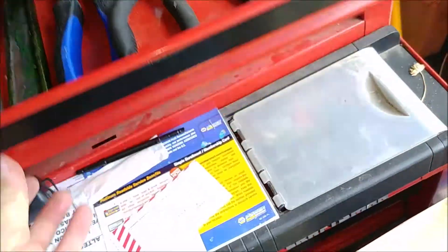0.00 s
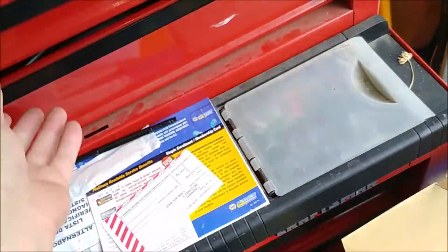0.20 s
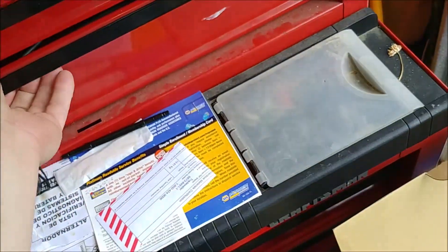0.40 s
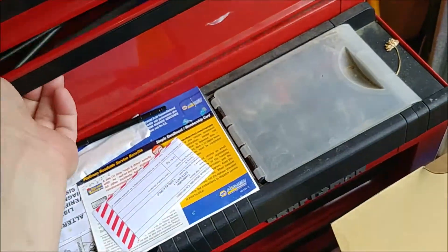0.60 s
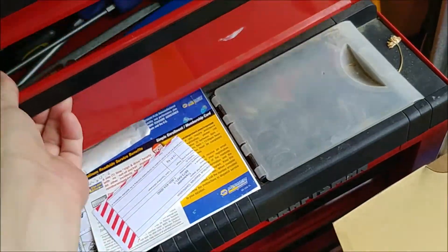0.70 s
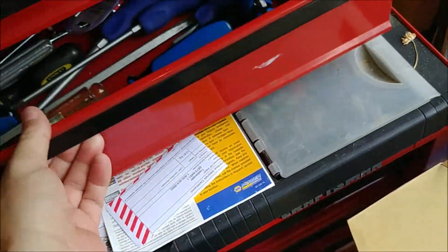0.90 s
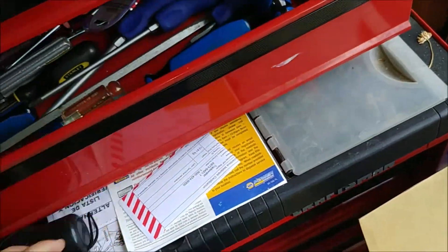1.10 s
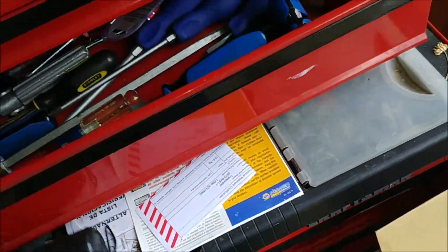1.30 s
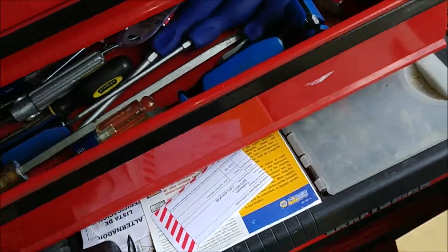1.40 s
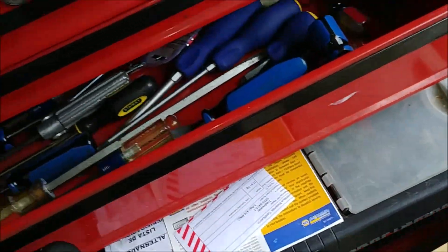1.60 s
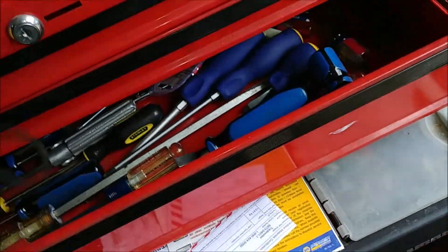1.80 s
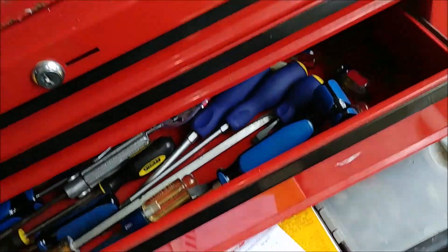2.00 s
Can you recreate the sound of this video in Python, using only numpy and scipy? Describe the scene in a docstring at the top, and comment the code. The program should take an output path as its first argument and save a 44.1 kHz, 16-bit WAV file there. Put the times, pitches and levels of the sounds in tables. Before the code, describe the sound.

A steel tool chest drawer rattles along its runners and slams shut at about 0.3 seconds, the cabinet booming briefly and loose tools jingling. From 0.6 seconds another drawer scrapes open with clinks and faint squeaks, knocking against its stop at 1.1 seconds. A sharp metal clack follows at 1.5 seconds. A hand brushes softly, and everything is close, over a low garage hum.

```python
"""In a humming garage, a steel tool-chest drawer rattles along its runners and slams shut.
Each blow rings sheet steel, panels and runners; the slam booms through the cabinet.
The next drawer is pulled out and knocks against its stop, then metal clacks sharply once more.
Loose tools clink, the runners squeak faintly and a hand brushes softly, all close by."""
import sys
import numpy as np
from scipy import signal
from scipy.fft import rfft, irfft
from scipy.io import wavfile
from scipy.ndimage import uniform_filter1d

SR = 44100
rng = np.random.default_rng(int(sys.argv[2]) if len(sys.argv) > 2 else 0)


def dump(signal):
    """Clip the signal to [-1, 1] and save it as 16-bit WAV at the path in sys.argv[1]."""
    limited = np.clip(np.atleast_2d(signal).T, -1, 1)
    pcm = np.round(limited * 32767).astype(np.int16)
    wavfile.write(sys.argv[1], SR, pcm)


N = 92610
T = np.arange(N) / SR
FREQ_HZ = np.maximum(np.arange(N // 2 + 1) * SR / N, 1)
BAND_HZ = 31.25 * 2 ** np.arange(0, 9.1, .5)


def undb(db):
    """Decibels to gain."""
    return 10 ** (np.asarray(db) / 20)


def lookup(table, hz, column=1):
    """One column of a table, read along log frequency."""
    table = np.array(table, float)
    return np.interp(np.log(hz), np.log(table[:, 0]), table[:, column])


def fade(t, t60_s):
    """Exponential decay."""
    return np.exp(-np.log(1000) * t / np.maximum(t60_s, .005))


def wander(smooth_s):
    """Smooth random drift with a spread of 1."""
    drift = uniform_filter1d(rng.standard_normal(N), max(int(smooth_s * SR), 1))
    return drift / drift.std()


def bell(centre_s, width_s):
    """Gaussian swell and fade."""
    return np.exp(-.5 * ((T - centre_s) / width_s) ** 2)


def tint(bands, db):
    """Mix the bands at the given levels."""
    return np.tensordot(undb(db), bands, 1)


# Each row: frequency in Hz, likeness of left and right from 0 to 1.
STEREO_LIKENESS = [(130, .96), (400, .92), (700, .65), (1400, .12), (5000, .02)]


def noise_bands():
    """Half-octave stereo noise bands, unit power per octave, alike in the bass: bands x 2 x N."""
    alike = np.clip(lookup(STEREO_LIKENESS, FREQ_HZ), 0, 1)
    mid, side = rfft(rng.standard_normal((2, N)))
    pair = mid * np.sqrt(1 + alike) + np.array([[1], [-1]]) * side * np.sqrt(1 - alike)
    half_octaves = 2 * np.log2(FREQ_HZ / BAND_HZ[:, None])
    shapes = np.cos(np.pi / 2 * np.clip(half_octaves, -1, 1)) ** 2
    bands = irfft(pair * shapes[:, None], N)
    return bands / np.sqrt(2 * np.mean(bands ** 2, axis=(1, 2), keepdims=True))


def mode_ring(modes, t, t60_s, scatter=.004, half_t60_hz=8900):
    """Clear modes, detuned at each blow; high ones die first and differ more in phase left to right."""
    out = 0
    for hz, db in modes:
        phases = (1 - lookup(STEREO_LIKENESS, hz)) * rng.uniform(-np.pi, np.pi, (2, 1))
        pitch_hz = hz * (1 + scatter * rng.standard_normal())
        decay = fade(t, t60_s / (1 + hz / half_t60_hz))
        out = out + undb(db) * decay * np.sin(2 * np.pi * pitch_hz * t + phases)
    return out


# Each row: frequency in Hz, octave level in dB, base t60 in seconds.
SHEET_STEEL = [(40, -38.5, 0.32), (81, -13.5, 0.33), (171, -7, 0.42), (450.6, 1, 0.3), (800, -11.5, 0.32),
               (1120, -6, 0.3), (2245, -3, 0.22), (4270, -1, 0.18), (7750, -5.5, 0.2), (15000, -8.5, 0.16)]


def sheet_ring(bands, t, db, t60_factor):
    """Countless close modes of sheet steel, as decaying noise; the high ones die first."""
    decay = fade(t, t60_factor * lookup(SHEET_STEEL, BAND_HZ, column=2)[:, None])
    return np.einsum("bcn,bn->cn", bands, decay * undb(db)[:, None])


# Each row: frequency in Hz, octave level in dB.
GARAGE_SPECTRUM = [(30, -88.5), (60, -57.5), (100, -46.5), (200, -65), (700, -64.5), (1800, -74),
                   (6000, -71), (15000, -66)]


def garage():
    """Low steady hum and faint hiss of the room."""
    return tint(noise_bands(), lookup(GARAGE_SPECTRUM, BAND_HZ))


# Each row: frequency in Hz, octave level in dB.
RUB_SPECTRUM = [(300, -34), (1500, -14), (3500, 9.5), (5500, -4.5), (8000, 0), (15000, -5.5)]
# Each row: centre in seconds, level in dB, half width in seconds, tilt in dB per octave.
RUBS = [(0.726, -40, 0.015, 6), (0.764, -44.5, 0.037, 1), (1.294, -55, 0.015, 12), (1.39, -55, 0.028, 4),
        (1.476, -47.5, 0.011, 5.5), (1.775, -62, 0.052, 4.5), (2.091, -60.5, 0.02, 5)]


def brushing():
    """Hand and drawer rub in short, soft hisses."""
    bands, octaves = noise_bands(), np.log2(BAND_HZ / 4500)
    return sum(tint(bands, db + lookup(RUB_SPECTRUM, BAND_HZ) + tilt * octaves) * bell(centre_s, width_s)
               for centre_s, db, width_s, tilt in RUBS)


# Each row: centre in seconds, pitch in Hz, level in dB, half width in seconds. The first row is a faint tick.
THIN_TONES = [(.538, 3333, -44.5, .002), (1.072, 4160, -62, 0.014), (1.96, 1211, -70, 0.089)]


def squeaks():
    """Thin, unsteady tones of steel creeping on steel, and one faint, very short tick."""
    return sum(undb(db) * bell(centre_s, width_s) * np.sin(2 * np.pi * hz * T + wander(width_s / 2))
               for centre_s, hz, db, width_s in THIN_TONES)


# Each row: time in seconds, scrape level in dB, rumble level in dB.
DRAWER_TRAVEL = [(0, -35, -41), (0.158, -40.5, -35.5), (.29, -36, -26), (.50, -59.5, -30.5),
                 (.61, -44, -28.5), (.70, -35, -41), (0.731, -27.5, -22), (.77, -34.5, -48),
                 (.93, -54, -30.5), (1.03, -61, -37.5), (1.10, -68, -39.5), (1.222, -80, -29.5),
                 (1.271, -59.5, -41.5), (1.60, -60.5, -39), (1.741, -71, -57.5), (2.1, -82.5, -58)]
# Each row, in both: frequency in Hz, relative octave level in dB.
SCRAPE_SPECTRUM = [(100, -24), (400, 3.5), (1000, -2.5), (2500, 6), (5000, -6), (8000, -15), (15000, -8)]
RUMBLE_SPECTRUM = [(30, -35), (60, -19.5), (100, 1.5), (150, -2.5), (230, -17), (430, -2), (700, -20.5),
                   (3000, -49.5)]


def sliding(slips_per_s=460, spread_db=4):
    """Runners stick and slip in tiny clicks while the moving drawer rumbles."""
    times_s, scrape_db, rumble_db = np.array(DRAWER_TRAVEL).T
    bands, t = noise_bands(), T[:SR // 5]
    slips = (rng.random(N) < slips_per_s / SR) * rng.choice([-1, 1], N)
    slips = slips * undb(spread_db * rng.standard_normal(N))
    drive = slips / slips.std() * undb(np.interp(T, times_s, scrape_db))
    ring = sheet_ring(bands[:, :, :len(t)], t, lookup(SCRAPE_SPECTRUM, BAND_HZ), t60_factor=0.62)
    ring /= np.sqrt(np.sum(ring ** 2) / 2)
    scrape = signal.fftconvolve(drive[None], ring, axes=1)[:, :N]
    rumble = tint(bands, lookup(RUMBLE_SPECTRUM, BAND_HZ)) * undb(np.interp(T, times_s, rumble_db))
    return scrape + rumble


def clink(modes, start_s, db, t60_s):
    """One clean metal-on-metal contact."""
    return undb(db) * (T > start_s) * mode_ring(modes, np.abs(T - start_s), t60_s)


# Each row: frequency in Hz, level in dB.
SCREWDRIVER_MODES = [(1230, -4), (1420, 0), (1790, 0), (2540, -2)]
# Each row: start in seconds, level in dB.
TOOL_CLINKS = [(0.633, -28), (.648, -18), (.777, -23.5), (0.84, -17.5), (0.863, -25)]


def loose_tools(t60_s=0.096, hops=9, first_s=.35, last_s=0.6, hop_db=-16.5, rattle_t60_s=0.4):
    """Screwdrivers clink as the drawer moves; after the slam, larger tools hop ever more weakly."""
    out = sum(clink(SCREWDRIVER_MODES, start_s, db, t60_s) for start_s, db in TOOL_CLINKS)
    for start_s, size in rng.uniform((first_s, 1), (last_s, 1.5), size=(hops, 2)):
        modes = [(hz / size, db) for hz, db in SCREWDRIVER_MODES]
        out += clink(modes, start_s, hop_db, t60_s) * fade(start_s - first_s, rattle_t60_s)
    return out


# Each row: start in seconds, pitch in Hz, level in dB, t60 in seconds.
FLOOR_KNOCKS = [(.312, 588.2, -15, 0.31), (0.782, 428.3, -18.5, 0.15), (.829, 435, -8, 0.051),
                (.830, 668, -19, 0.078), (0.861, 467, -16, 0.11), (1.109, 169, -21, 0.26),
                (1.109, 343, -18, 0.061), (1.119, 388, -1, 0.049), (1.121, 596, -17.5, 0.11),
                (1.16, 362, -15, 0.059), (1.192, 401, -19, 0.094), (1.502, 466.5, -13, 0.11),
                (1.503, 542.6, -12, 0.094)]


def knocks(rise_s=0.0014):
    """The thin drawer floor answers the heavier blows with a short hollow note."""
    out = np.zeros(N)
    for start_s, hz, db, t60_s in FLOOR_KNOCKS:
        t = np.maximum(T - start_s, 0)
        envelope = (1 - np.exp(-t / rise_s)) * fade(t, t60_s)
        out += undb(db) * np.sqrt(2) * envelope * np.sin(2 * np.pi * hz * t)
    return out


# Each row: time in seconds, level in dB.
BOOM_ENVELOPE = [(0.309, -20), (0.343, -13.5), (0.406, -10), (.45, -16), (0.532, -17), (.56, -36),
                 (0.619, -29), (.74, -32), (.82, -39)]


def cabinet_boom(main_hz=151, under_hz=135, under_db=-9, drift_hz=1.2, drift_s=0.039):
    """The whole cabinet booms on two unsteady, beating notes that build after the slam and die away."""
    times_s, db = np.array(BOOM_ENVELOPE).T
    envelope = undb(np.interp(T, times_s, db, left=-np.inf, right=-np.inf))
    main, under = (np.sin(2 * np.pi * np.cumsum(hz + drift_hz * wander(drift_s)) / SR)
                   for hz in (main_hz, under_hz))
    return np.sqrt(2) * envelope * (main + undb(under_db) * under)


# Steel runners and lip. Each row: frequency in Hz, level in dB.
RUNNER_MODES = [(1276, -3), (2122, 1), (2365, 1), (2668, -2), (3014, -4), (3330, 1), (3466, 2), (4721, -4),
                (5656, 1), (5940, 0), (7840, 0), (8299, -2)]


def clack():
    """The drawer lip snaps against the runners."""
    return clink(RUNNER_MODES, start_s=1.501, db=-16, t60_s=.11)


# Cabinet panels. Each row: frequency in Hz, level in dB.
PANEL_MODES = [(264, -5), (331, -1), (396, 0), (678, -4), (808, 0), (909, 2), (996, -4), (1140, -2),
               (1219, 0), (1378, -5)]
# Centres of boom, body, clang and tick.
FORCE_HZ = [140, 750, 2300, 9000]
# Each row: start in seconds, boom, body, clang and tick levels in dB, rise in seconds, t60 factor.
BLOWS = [ (.076, -30.5, -29.5, -17, -34.5, 0.028, 0.82), (.181, -35, -27, -32, -45, 0.007, 2),
         (0.202, -26.5, -24, -19.5, -35.5, 0.01, 0.58), (.245, -36, -18.5, -14.5, -22, 0.0066, 0.48),
         (0.29, -35, -54, -18.5, -45.5, 0.012, 0.77), (.310, -21, -15.5, -12.5, -15.5, 0.0005, 0.71),
         (0.335, -43, -12, -15.5, -39, 0.0013, 1.22), (0.345, -32, -18.5, -15.5, -33, 0.0055, 0.92),
         (0.376, -12, -22.5, -31, -42.5, 0.0024, 0.96), (.440, -16.5, -28, -49.5, -97, 0.0048, 1.03),
         (.631, -30, -30, -21, -59, 0.0127, 0.73), (0.651, -45, -38, -46.5, -34, 0.0014, 0.78),
         (.772, -36, -24, -24, -69, 0.00355, 0.79), (.829, -30, -20, -21, -36, 0.0022, 0.63),
         (.850, -55, -47.5, -17, -24, 0.0014, 0.6), (.920, -34, -38, -38, -45, 0.0062, 0.92),
         (1.107, -29, -25.5, -27.5, -32.5, 0.0025, 0.85), (1.120, -22, -25, -19.5, -34, 0.0053, 0.56),
         (1.164, -24, -37, -33.5, -42.5, 0.018, 0.74), (1.500, -26.5, -23.5, -13, -8.5, 0.003, 0.53),
         (1.516, -31, -29, -14, -19.5, .002, 0.52)]


def strikes(panel_db=-11, panel_t60_s=0.33, runner_db=-16, runner_t60_s=0.28):
    """Each blow of drawer or tool rings sheet, panels and runners, by how heavy and how hard it is."""
    out, bands = np.zeros((2, N)), noise_bands()
    parts = (PANEL_MODES, panel_db, panel_t60_s), (RUNNER_MODES, runner_db, runner_t60_s)
    for start_s, *force_db, rise_s, t60_factor in BLOWS:
        i = int(start_s * SR)
        t = T[:min(N - i, SR // 2)]
        force = list(zip(FORCE_HZ, force_db))
        sheet_db = lookup(force, BAND_HZ) + lookup(SHEET_STEEL, BAND_HZ)
        blow = sheet_ring(bands[:, :, i:i + len(t)], t, sheet_db, t60_factor)
        for modes, part_db, t60_s in parts:
            driven = [(hz, db + part_db + lookup(force, hz)) for hz, db in modes]
            blow += mode_ring(driven, t, t60_s * t60_factor)
        attack = np.minimum(t / rise_s, 1)
        out[:, i:i + len(t)] += blow * attack * np.sqrt(2)
    return out


def scene():
    """The chest, the tools, the hand and the room together."""
    impacts = clack() + strikes() + knocks() + cabinet_boom() + loose_tools()
    return impacts + sliding() + squeaks() + brushing() + garage()


# Colour of the sound, with a deep notch near 10 kHz. Each row: frequency in Hz, gain in dB.
SOUND_COLOUR = [(1800, -0.5), (3300, 0.42), (4000, -2), (5100, -1), (5800, 1.38), (7000, -2), (8100, 2.94),
                (9200, -7.5), (10200, -20), (11800, -9.5), (14000, -4.5), (16000, -6)]
# Each row: frequency in Hz, left minus right in dB.
MIC_BALANCE = [(300, 4), (700, 4.5), (1300, 0), (2400, -5.5), (4400, -0.5), (6500, 2.5), (8100, 16),
               (12000, 2)]


def record(dry, ceiling=0.9, top_hz=15900):
    """Two small microphone ports colour the sound, and apart from them a deep notch near 10 kHz thins the
    treble; the loudest peaks are rounded and the top is cut."""
    db = lookup(SOUND_COLOUR, FREQ_HZ) + np.array([[.5], [-.5]]) * lookup(MIC_BALANCE, FREQ_HZ)
    coloured = irfft(rfft(dry) * undb(db), N)
    rounded = ceiling * np.tanh(coloured / ceiling)
    return signal.sosfilt(signal.ellip(8, .2, 70, top_hz, fs=SR, output="sos"), rounded)


dry = scene()
out = record(dry)
dump(out)
```